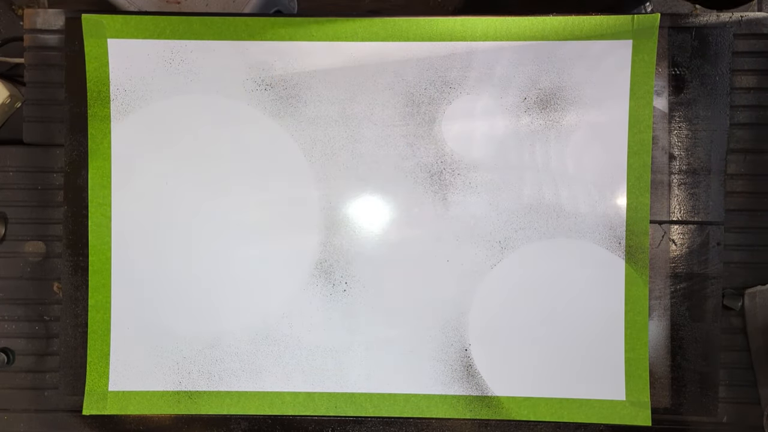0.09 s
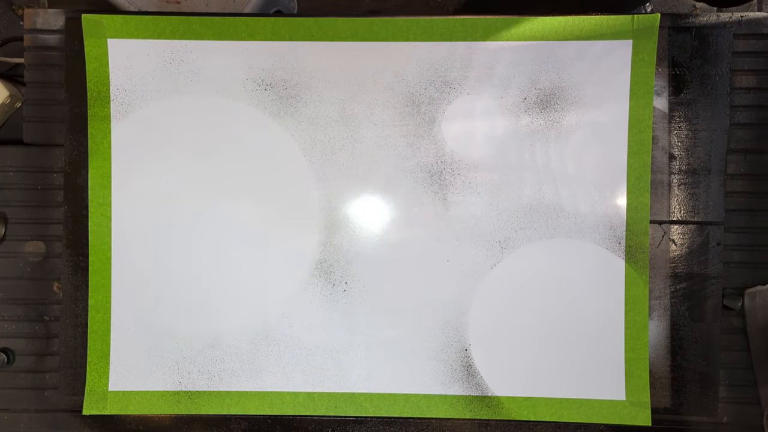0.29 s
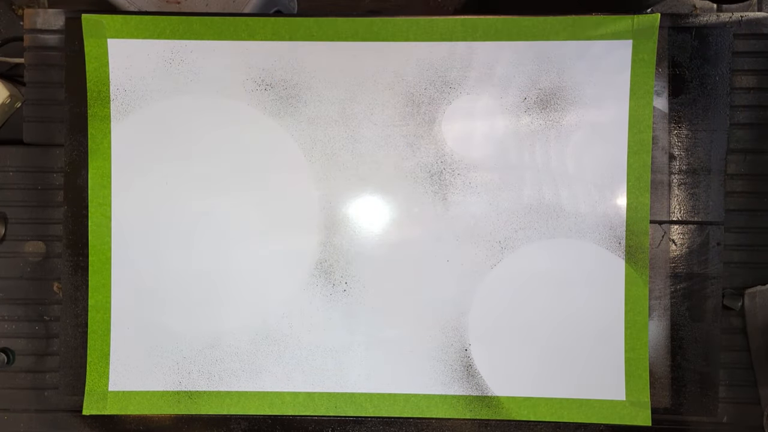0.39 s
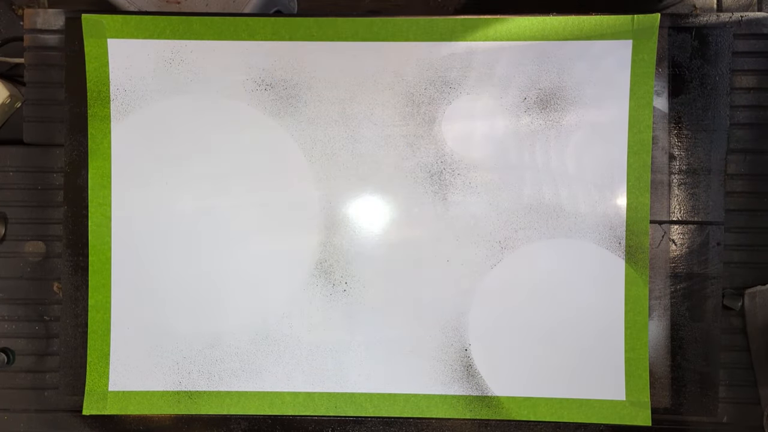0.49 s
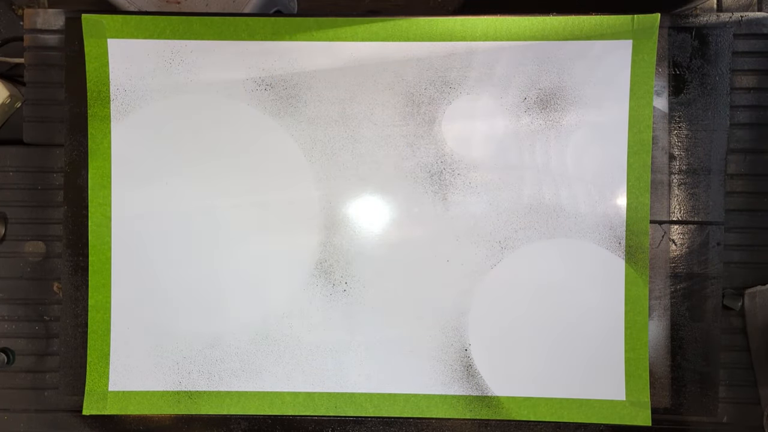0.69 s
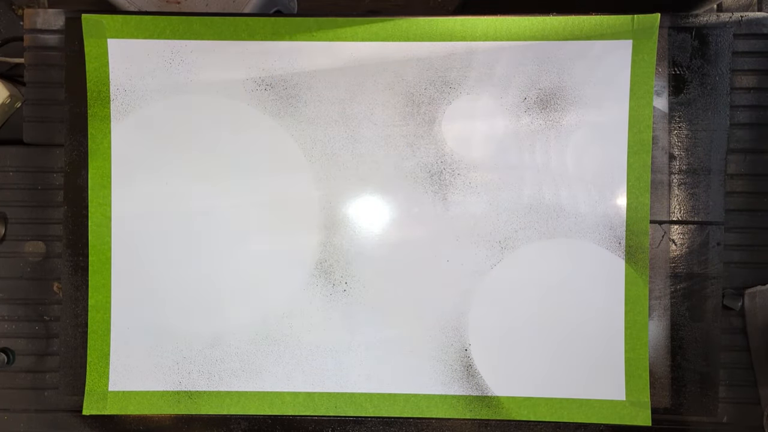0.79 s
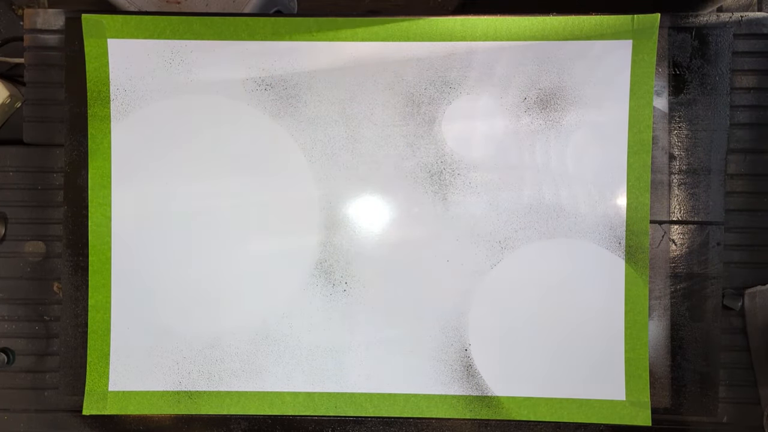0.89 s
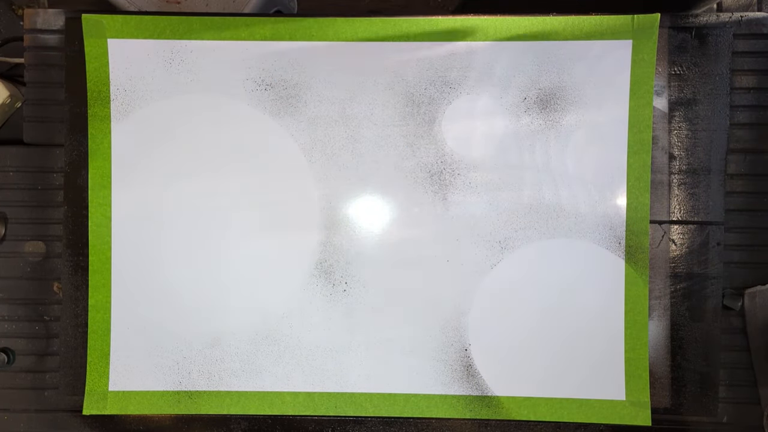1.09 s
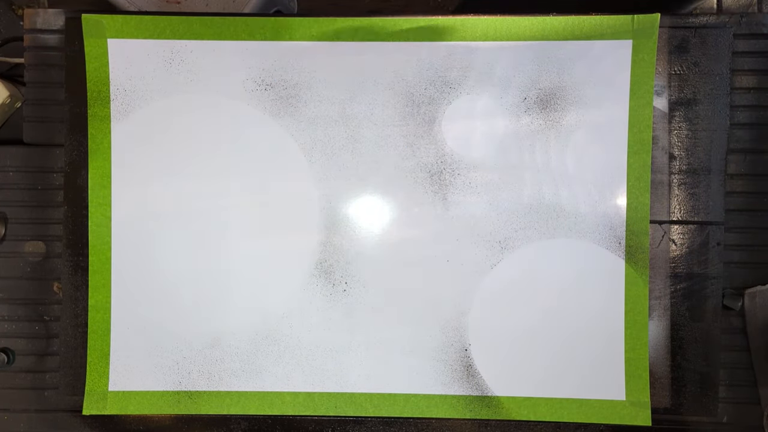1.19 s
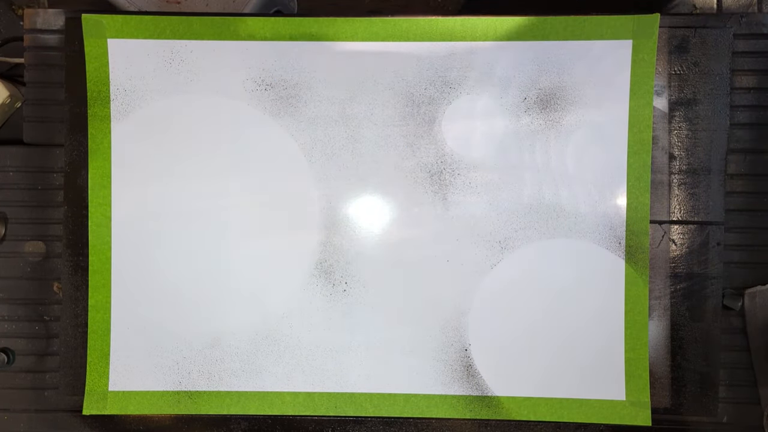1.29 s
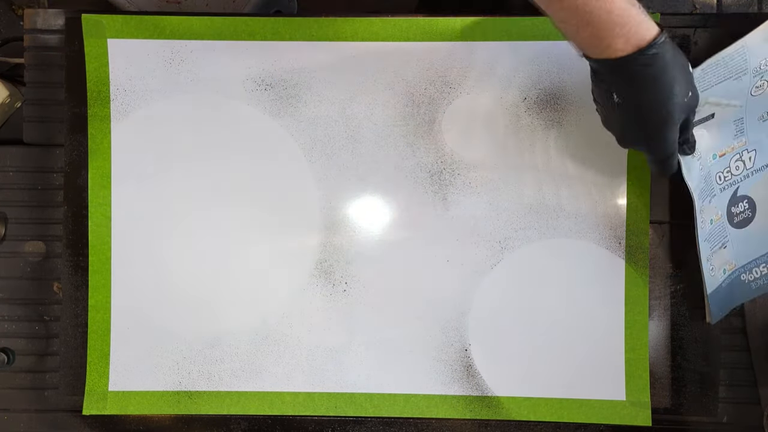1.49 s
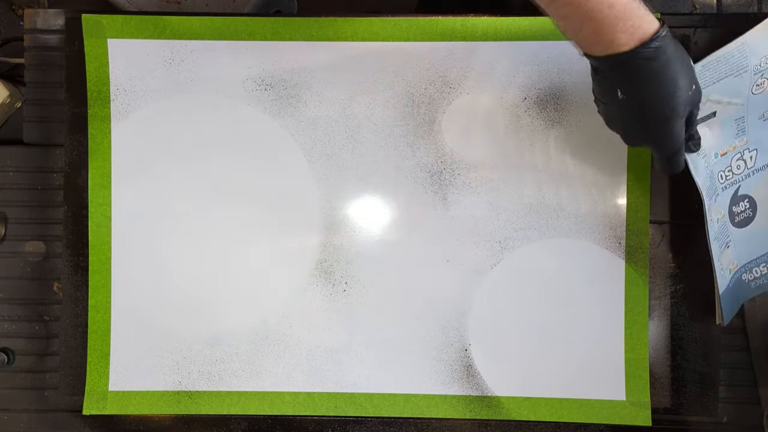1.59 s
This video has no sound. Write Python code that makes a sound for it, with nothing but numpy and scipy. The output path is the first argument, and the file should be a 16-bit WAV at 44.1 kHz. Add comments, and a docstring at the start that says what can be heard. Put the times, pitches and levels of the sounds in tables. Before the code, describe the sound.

A stiff printed sheet cracks sharply twice, then snaps again in a quick cluster, with brief rustles and small table rings between, close in stereo in a small hard room with quiet ventilation.

```python
"""In a small, hard-walled room, a stiff printed sheet is handled at a work table, a little left of the microphone.
It buckles in sharp cracks, flurries of tiny random snaps coloured band by band, and its panels pop as short tones.
Some of the cracks, hard and soft, knock the table and set things on it ringing: decaying, uneven sines.
Between them the paper rustles as a dense stream of grains, and a swing of the sheet makes a dull noise swish.
Below lies the ventilation: two layers of coloured noise, a low rumble and soft air, with faint steady fan tones."""
import sys
import numpy as np
from scipy import signal
from scipy.io import wavfile

SR = 44100
rng = np.random.default_rng(int(sys.argv[2]) if len(sys.argv) > 2 else 0)


def pcm_store(signal):
    """Save signal as 16-bit PCM."""
    levels = np.round(np.clip(np.atleast_2d(signal), -1, 1) * 32767)
    wavfile.write(sys.argv[1], SR, levels.astype(np.int16).T)


N = 70560
T = np.arange(SR // 2) / SR   # half a second of time, for the short sounds
EDGES = 22 * 2 ** (np.arange(29.5) / 3.05)   # Hz, bands of about a third-octave
CENTRES = np.sqrt(EDGES[1:] * EDGES[:-1])
SNAP_RISE_S = 0.0022   # onset of cracks and pops
RIGHT_LAG_S = .00046   # extra travel time to the right microphone

# Pitches in Hz at which the colour of a crack is given.
COLOUR_HZ = [150, 300, 600, 1100, 1700, 2800, 4200, 7000, 12000]
# Cracks of the buckling sheet. Each row: start in seconds, fade time constant in seconds,
# room level in dB against the direct sound, then the spectral level in dB at each of COLOUR_HZ.
CRACKS = [ (0.215, 0.0035, 6.5, 5.5, 1.5, 7.5, 8.5, 14.5, 10, 7, -1.5, -15.5),
          (0.348, 0.0065, 2, 6.5, 5, 11.5, 14, 19.5, 13.5, 7, 1.5, -3),
          (0.8377, 0.0045, 7, 2.5, 9, 17, 13.5, 8, 13.5, 4, 2, 0),
          (0.8479, 0.0013, 4.5, -6, 4.5, 3.5, 11.5, 14.5, 10, -9.5, 4, 1),
          (.8660, 0.0032, 9.5, -24, 1.5, 3, 4, 5, -7, -1.5, -10, -10),
          (0.9736, 0.0034, -3, -38, -9, -19, -9, -18.5, -21, -28, -16.5, -21.5),
          (1.0480, 0.0021, 4, -5.5, -5.5, 12.5, 10.5, 15.5, 9, 4, 2.5, -5.5),
          (1.2573, 0.0026, 1.5, -30, -15, -6.5, -9, -7, -21, -9.5, -17, -21.5),
          (1.3088, 0.0025, 9, -27, -12.5, -0.5, 1, 5, -4, -5.5, -16.5, -21.5)]
SNAPS_PER_S, SNAP_SPREAD_DB = 7000, 5.5


def cracks():
    """Each crack is a flurry of snaps a few milliseconds long, with its own colour."""
    out = np.zeros((2, N))
    for start_s, fade_s, room_db, *levels_db in CRACKS:
        shape = (1 - np.exp(-T / SNAP_RISE_S)) * np.exp(-T / fade_s)
        # two flurries alternate between neighbouring bands
        flurries = [snaps(SNAPS_PER_S, SNAP_SPREAD_DB, len(T)) * shape for _ in range(2)]
        colour = list(zip(COLOUR_HZ, levels_db))
        for k, hz in enumerate(CENTRES):
            if hz > COLOUR_HZ[0] / 2:
                placed = in_room(band(flurries[k % 2], k), hz, room_db)
                add(out, start_s, amp(at_hz(colour, hz)) * placed)
    return out


# Panels of the sheet popping through.
# Each row: start in seconds, pitch in Hz, level of the whole pop's energy in dB, time to fall 60 dB in seconds.
POPS = [(0.2171, 1700, 8, 0.011), (0.2227, 3256, 1, 0.0099), (0.3491, 2570, 7.5, 0.02),
        (0.3494, 1683, -2.5, 0.038), (0.847, 623, 3, 0.027), (0.872, 1013, -7, 0.029),
        (0.977, 1270, -19.5, 0.019), (1.05, 3170, -2.5, 0.005), (1.049, 1445, -1.5, 0.013),
        (1.3113, 1597, -7.5, 0.0063)]
POP_ROOM_DB = 0   # reflections against direct sound


def pops():
    """A panel of the sheet pops through and rings briefly at its own pitch."""
    out = np.zeros((2, N))
    for start_s, hz, level_db, t60_s in POPS:
        shape = amp(-60 * T / t60_s) * (1 - np.exp(-T / SNAP_RISE_S))
        tone = np.sin(2 * np.pi * hz * T) * shape
        add(out, start_s, amp(level_db) * in_room(unit(tone), hz, POP_ROOM_DB))
    return out


# Things on the table set ringing by a knock. Each row: start in seconds, then three matching lists:
# mode pitches in Hz, amplitudes in dB before rise and decay, times to fall 60 dB in seconds.
KNOCKS = [ (.220, [548, 860, 1704, 2498, 2546, 3246, 3666, 5000],
          [-31.5, -32, -16, -26.5, -32.5, -20, -22.5, -24.5],
          [0.22, 0.16, 0.082, 0.25, 0.097, 0.067, 0.17, 0.081]),
          (.352, [61, 1270, 1614, 2420, 2575, 2645, 3750], [-45, -31.5, -22.5, -29, -32, -23.5, -30.5],
          [0.56, 0.16, 0.2, .14, 0.13, 0.085, 0.12]), (.849, [54, 393, 500, 613, 732, 1035, 1254],
          [-43, -31, -30, -23.5, -24, -27, -22.5], [0.6, 0.08, 0.18, 0.16, 0.094, 0.12, 0.12]),
          (.976, [721, 1219, 1814, 2530], [-50.5, -45, -53, -57.5], [1.8, 0.37, 0.69, 1.7])]
RING_RISE_S = 0.00067
RING_PHASE_SPREAD = .3   # radians by which reflections shift one side, at full scatter
RING_WAVER = .25         # depth of the unevenness from reflections, at full scatter
RING_LAG_LIMIT = 1.5     # radians; reflections leave the two sides about a quarter cycle apart


def knocks():
    """Struck things ring on in their modes after the crack, unevenly among the reflections."""
    out = np.zeros((2, N))
    for start_s, *modes in KNOCKS:
        for hz, level_db, t60_s in zip(*modes):
            lag = min(2 * np.pi * hz * RIGHT_LAG_S, RING_LAG_LIMIT)
            scatter = lag / RING_LAG_LIMIT   # a low thud is alike on both sides
            shift = scatter * RING_PHASE_SPREAD * rng.standard_normal((2, 1))
            phase = rng.uniform(0, 2 * np.pi) + shift
            angle = 2 * np.pi * hz * T + phase - np.array([[0], [lag]])
            uneven = waver(len(T)) * np.sin(angle) + waver(len(T)) * np.cos(angle)
            tone = np.sin(angle) + scatter * RING_WAVER * uneven
            shape = amp(level_db - 60 * T / t60_s) * (1 - np.exp(-T / RING_RISE_S))
            add(out, start_s, shape * tone)
    return out


WAVER_S = .014   # time between the wobble's random points


def waver(size):
    """Slow stereo wobble: straight lines between random points of spread one."""
    knots = np.arange(size) / (WAVER_S * SR)
    return np.array([np.interp(knots, np.arange(len(row)), row) for row in rng.standard_normal((2, N))])


# Loudness of the sliding paper. Each row: time in seconds, rms level in dB.
RUSTLE = [(0, -45.5), (.06, -75.5), (.28, -94), (.335, -48), (.42, -63), (.63, -80), (.72, -83.5),
          (.95, -67.5), (1.13, -54.5), (1.19, -65.5), (1.235, -53), (1.29, -56.5), (1.39, -56.5),
          (1.445, -74), (1.48, -60), (1.6, -84)]
# Tone of the sliding paper. Each row: frequency in Hz, relative spectral level in dB per Hz.
RUSTLE_COLOUR = [(200, -0.5), (2000, -1.5), (4000, -9.5), (8000, -11), (12000, -9), (15000, -10.5)]
GRAINS_PER_S, GRAIN_SPREAD_DB = 14000, 6
RUSTLE_ROOM_DB = 4   # reflections against direct sound


def rustle():
    """Sliding paper sheds a dense stream of tiny grains."""
    grains = [snaps(GRAINS_PER_S, GRAIN_SPREAD_DB, N) for _ in range(2)]
    out = np.zeros((2, N))
    for k, hz in enumerate(CENTRES):
        if hz > COLOUR_HZ[0]:
            placed = in_room(band(grains[k % 2], k), hz, RUSTLE_ROOM_DB)
            out += amp(at_hz(RUSTLE_COLOUR, hz)) * placed
    return unit(out) * np.sqrt(N) * curve(RUSTLE)


# Loudness of the swung sheet. Each row: time in seconds, rms level in dB.
SWISH = [(1.52, -85), (1.555, -56), (1.6, -62.5)]
# Tone of the swung sheet. Each row: frequency in Hz, relative spectral level in dB per Hz.
SWISH_COLOUR = [(150, -20.5), (500, 9), (2400, 0.5), (4000, -15), (14000, -27.5)]


def swish():
    """The sheet swung over the table makes a dull swell of noise."""
    return curve(SWISH) * hiss(SWISH_COLOUR)


# Low part of the ventilation. Each row: frequency in Hz, relative spectral level in dB per Hz.
RUMBLE = [(25, -24.5), (38, -15.5), (52, 6), (75, -4), (100, -1.5), (135, -21.5), (190, -29)]
# Airy part of the ventilation. Each row: frequency in Hz, relative spectral level in dB per Hz.
AIR = [(120, -19), (220, -0.5), (450, 7), (800, 2), (2500, -7), (4000, -16), (8000, -26.5), (15000, -56.5)]
RUMBLE_DB, AIR_DB = -54.5, -63.5   # rms


def ventilation():
    """Moving air makes steady noise: a low rumble and a softer, brighter layer."""
    return amp(RUMBLE_DB) * hiss(RUMBLE) + amp(AIR_DB) * hiss(AIR)


# Tones of the fan. Each row: pitch in Hz, rms level in dB.
FAN_TONES = [(120, -72.5), (326, -75), (501, -71)]


def hum():
    """The turning fan adds faint steady sine tones."""
    t = np.arange(N) / SR
    tones = np.zeros(N)
    for hz, rms_db in FAN_TONES:
        tones += np.sqrt(2) * amp(rms_db) * np.sin(2 * np.pi * (hz * t + rng.random()))
    return from_left(tones)


def snaps(per_s, spread_db, size):
    """Random clicks of either sign, most of them weak and a few strong."""
    chance, strength, sign = rng.random((3, size))
    boost_db = -spread_db * np.log(np.maximum(strength, np.exp(-4)))   # at most four spreads
    return (chance < per_s / SR) * amp(boost_db) * np.sign(sign - .5)


NOISE_SCATTER_DB = 2.5   # part that differs between the sides, against the shared part


def hiss(colour):
    """Smooth coloured stereo noise of rms one: a shared part plus a part of each side's own."""
    shared = [from_left(white) for white in rng.standard_normal((2, N))]
    own = amp(NOISE_SCATTER_DB) * rng.standard_normal((2, 2, N))
    out = np.zeros((2, N))
    for k, hz in enumerate(CENTRES):
        if EDGES[k] < colour[-1][0]:
            mixed = shared[k % 2] + apart(hz) * own[k % 2]
            out += amp(at_hz(colour, hz)) * band(mixed, k)
    return unit(out) * np.sqrt(N)


# Decay of the room. Each row: frequency in Hz, time to fall 60 dB in seconds.
ROOM_T60 = [(150, 0.19), (600, 0.25), (1700, 0.22), (5000, 0.18)]
ROOM_GAP_S = .0015   # silence before the first reflection
EARLY_DB, EARLY_FADE_S = -1, 0.0099   # early boost against the tail, and its time constant


def reflections(hz):
    """Stereo room response near one pitch: strong early echoes from the table, then a dying tail."""
    early = 1 + amp(EARLY_DB) * np.exp(-T / EARLY_FADE_S)
    fade = amp(-60 * T / at_hz(ROOM_T60, hz)) * early
    mid, side = rng.standard_normal((2, len(T))) * fade * (T > ROOM_GAP_S)
    return np.array([mid + apart(hz) * side, mid - apart(hz) * side])


# Balance of the direct sound. Each row: frequency in Hz, left minus right in dB.
TILT = [(300, -12), (1000, 6), (2000, -0.5), (4500, 5.5), (10000, 5.5)]


def in_room(x, hz, room_db):
    """Direct sound plus reflections at room_db against it, their summed energy held level."""
    direct = from_left(x) * amp(at_hz(TILT, hz) * np.array([[.5], [-.5]]))
    echoes = signal.fftconvolve(x[None], reflections(hz), axes=1)[:, :len(x)]
    wet = unit(echoes) * np.linalg.norm(x)
    return (direct + amp(room_db) * wet) / np.sqrt(1 + amp(room_db) ** 2)


def from_left(x):
    """The sound reaches the right microphone later."""
    i = np.arange(len(x))
    return np.array([x, np.interp(i - round(RIGHT_LAG_S * SR), i, x, left=0)])


BASS_ALIKE_HZ = 304   # longer waves reach both microphones increasingly alike


def apart(hz):
    """Weight of the part of a diffuse sound that differs between the sides."""
    return min(1, (hz / BASS_ALIKE_HZ) ** 2)


BANK = [signal.butter(2, edge, "band", fs=SR, output="sos") for edge in zip(EDGES, EDGES[1:])]


def band(x, k):
    """One band of about a third-octave, with the energy it has in a unit white sound."""
    share = 2 * (EDGES[k + 1] - EDGES[k]) / SR
    return unit(signal.sosfilt(BANK[k], x + 1e-18)) * np.sqrt(share)


def amp(db):
    """Decibels to gain."""
    return 10 ** (np.asarray(db) / 20)


def unit(x):
    """Energy one per channel."""
    return x / np.sqrt(np.sum(x ** 2, axis=-1, keepdims=True) + 1e-30)


def at_hz(points, hz):
    """Read a table on a log-frequency axis."""
    f, v = np.transpose(points)
    return np.interp(np.log(hz), np.log(f), v)


def curve(rows):
    """Gain in time from rows of seconds and dB."""
    return amp(np.interp(np.arange(N) / SR, *np.transpose(rows)))


def add(out, start_s, x):
    """Mix a sound in at its start time."""
    i = max(int(start_s * SR), 0)
    out[:, i:i + x.shape[1]] += x[:, :N - i]


def scene():
    """Paper and table over the ventilation."""
    paper = cracks() + pops() + rustle() + swish()
    return paper + knocks() + ventilation() + hum()


TOP_ROLLOFF_HZ, CUTOFF_HZ = 14000, 16500


def record(dry):
    """The top rolls off, then is cut steeply, 70 dB down from the cutoff upward."""
    soft = signal.sosfilt(signal.butter(6, TOP_ROLLOFF_HZ, fs=SR, output="sos"), dry)
    return signal.sosfilt(signal.cheby2(16, 70, CUTOFF_HZ, fs=SR, output="sos"), soft)


dry = scene()
out = record(dry)
pcm_store(out)
```